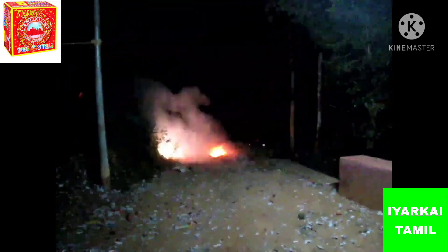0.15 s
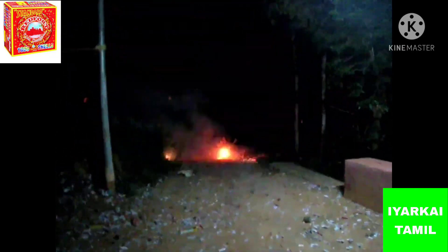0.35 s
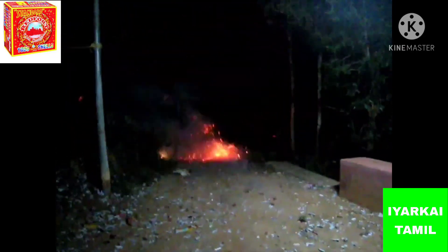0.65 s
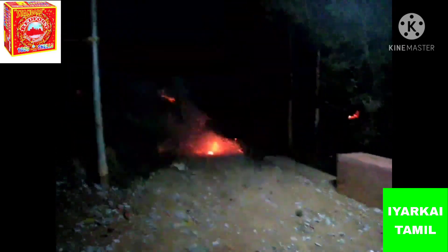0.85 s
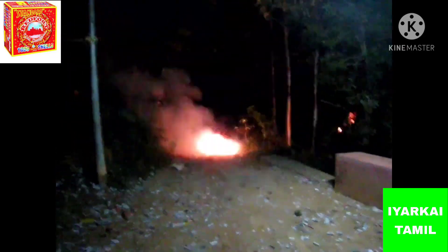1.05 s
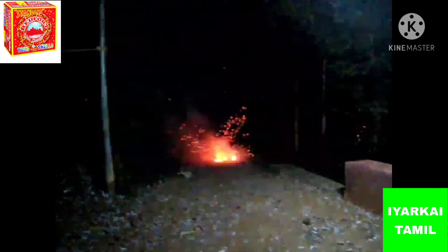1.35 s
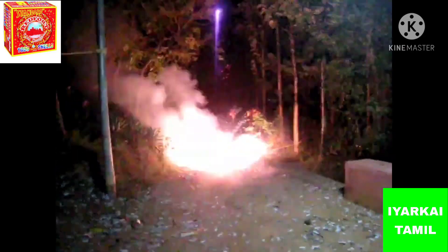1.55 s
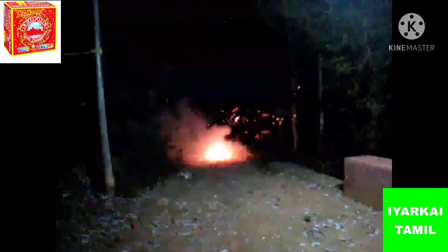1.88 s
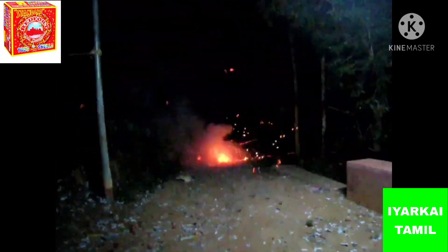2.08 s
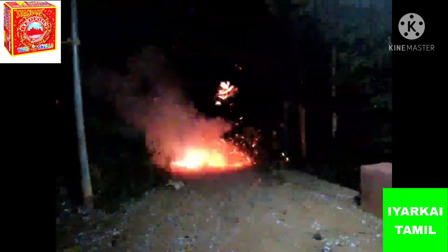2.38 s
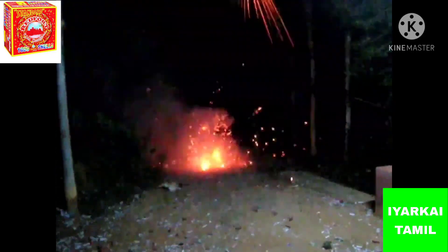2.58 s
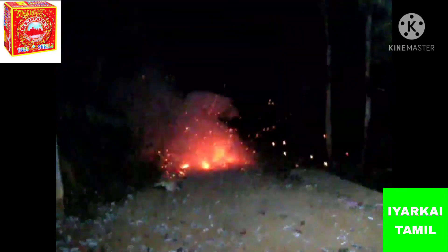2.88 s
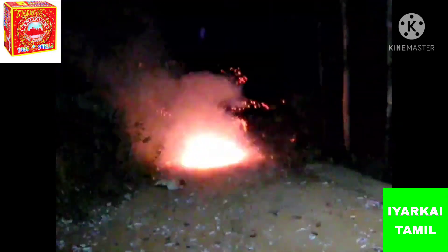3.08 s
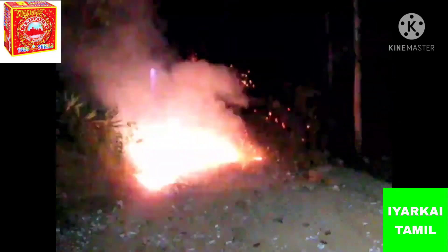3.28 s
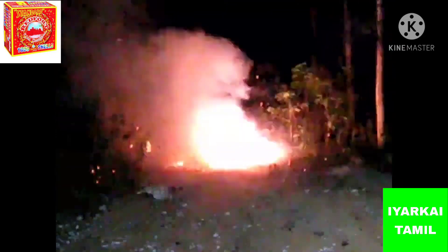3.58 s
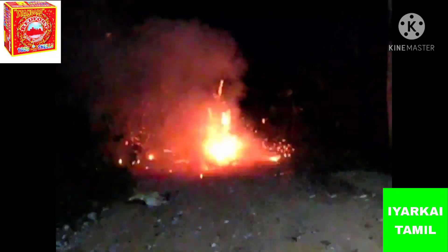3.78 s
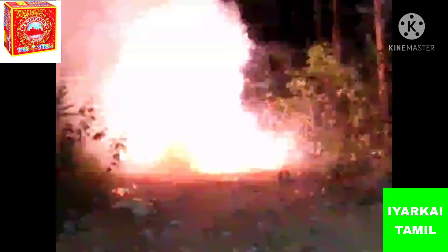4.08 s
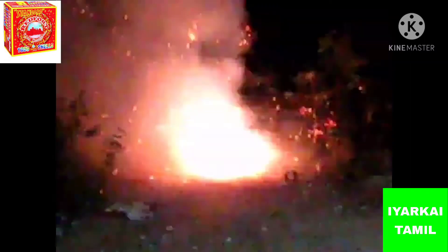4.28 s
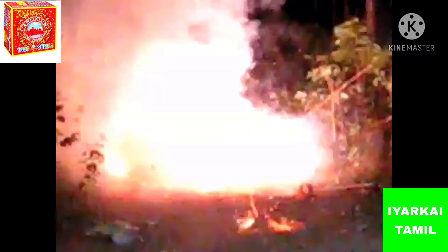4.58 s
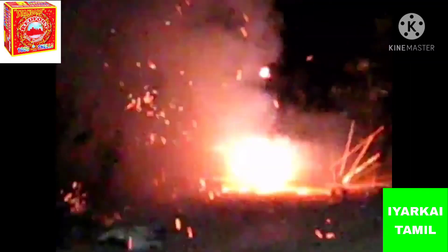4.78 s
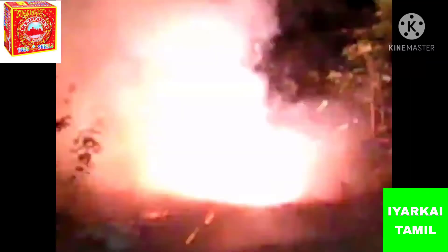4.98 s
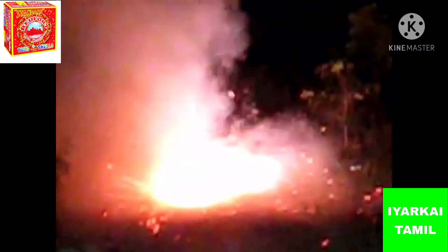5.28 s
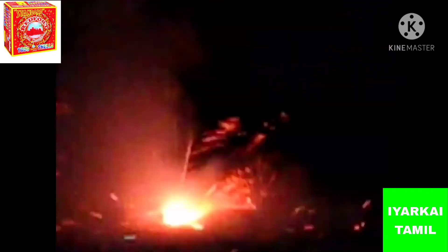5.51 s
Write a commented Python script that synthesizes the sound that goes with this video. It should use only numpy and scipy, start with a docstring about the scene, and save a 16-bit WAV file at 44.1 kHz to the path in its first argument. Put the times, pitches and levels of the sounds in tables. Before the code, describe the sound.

A firecracker string is already exploding at the start, outdoors on a stony track between trees, a few metres from the microphone. For the first two seconds the bangs are hard and irregular, roughly eight a second, with especially strong ones near 0.0, 0.3, 1.1 and 1.25 s. Between them, burning powder swells in hissing, crackling rushes that cut off quickly, and flung sparks fizz briefly. At about 1.6 s a deep, very short whump lands with a strong bang. From 2 s the chain tightens, and after 3 s it becomes a dense, uneven rattle of weak pops and loud cracks, around twenty a second, with heavy hits near 4.35, 4.8 and 5.55 s. Bushes and trees smear each blast into a short noisy wash over a quiet paper hiss. Peaks are flattened by overload, the extreme top is dull, and only the left channel sounds. It ends mid-chain, without slowing.

```python
"""A long string of firecrackers bangs away on a dirt track between trees, some metres from the microphone.
Each cracker is an N-shaped blast wave with close reflections, scatter from stones, a snap and a thump.
Bushes and trees answer with a wash of noise, and flung sparks fizz. Loose powder flares and crackles,
paper hisses on, and one heap gives a deep whump. The blasts overload the microphone; only the left channel sounds."""
import sys
import numpy as np
from scipy import signal
from scipy.fft import rfft, irfft
from scipy.io import wavfile
from scipy.ndimage import uniform_filter1d

SR = 44100
rng = np.random.default_rng(int(sys.argv[2]) if len(sys.argv) > 2 else 0)


def unload_wav(signal):
    """Save mono or channel-first audio to the path in sys.argv[1] as 16-bit WAV at rate SR, clipped to [-1, 1]."""
    wavfile.write(
        sys.argv[1],
        SR,
        np.round(np.clip(np.atleast_2d(signal).T, -1, 1) * 32767).astype(np.int16),
    )


N = 249165  # length of the sound in samples

# The crackers in the order they go off. A ragged burst scatters and snaps more.
# columns: start_s, strength_db, wave_length_ms, raggedness_db
CRACKERS = [(.0011,16,0.48,-19),(0.025,4.5,0.59,-8),(0.1671,3.5,0.77,2.5),(0.2797,18.5,0.56,-3),(0.3449,11,.49,-4.5),(0.3857,6,0.45,-2),(0.4017,-2,0.65,-6),(.463,4,0.47,1),
            (0.5861,12,0.43,-5.5),(0.6064,10.5,0.4,-8.5),(0.6337,5,0.61,-13),(.706,10.5,0.5,-8),(0.7722,14.5,0.45,-6.5),(0.8258,5,0.54,-0.5),(.853,0.5,0.45,5),(0.9831,8.5,0.56,-12),
            (1.1029,17,0.37,-5),(1.1188,5,0.46,-16),(1.1497,10,0.42,-6.5),(1.2573,15.5,0.42,-8.5),(1.306,7,0.43,-1.5),(1.3899,7.5,0.41,0.5),(1.4044,4,0.59,-2),
            (1.6059,17,0.56,-6.5),(1.6372,5.5,0.53,-4),(1.6635,7,0.55,-1),(1.6718,0.5,.52,-4),(1.7277,11,0.4,-4),(1.78,3,0.51,-11),(1.7927,4,0.41,-2),(1.8957,12,0.55,-7),
            (2.0278,6,0.49,3.5),(2.0644,11,0.42,-10.5),(2.1283,12.5,0.59,-10.5),(2.152,7.5,0.5,-13),(2.2338,16.5,0.59,-8.5),(2.2934,8,0.42,-6.5),(2.3348,5,.55,-18),(2.3383,0.5,0.44,-12),(2.396,-4,0.76,-16),(2.4285,13,0.41,-7.5),(2.475,4,0.59,-5.5),(2.494,2,0.46,-8),
            (2.5142,-1,0.52,-6),(2.5696,5,0.54,-10),(2.6367,4.5,0.5,-4),(2.657,5.5,0.43,-12),(2.7376,5,0.5,-6),(2.7905,-4,0.73,-10),(2.8527,4,0.51,-3),(2.8575,12.5,0.37,-3.5),(2.8677,8.5,0.49,-14),(2.8968,4,0.49,-12),(2.954,4.5,0.46,-15),(2.9961,-3,.6,-6),
            (3.0028,2.5,0.49,-2.5),(3.0218,2.5,0.5,-3.5),(3.12,10.5,.45,-7.5),(3.1355,-6,1,-3),(3.1858,11,0.55,-6.5),(3.2101,-1.5,0.54,-15),(3.237,1,0.54,-7),(3.3275,-8.5,0.36,5.5),(3.3694,13.5,0.59,-6.5),(3.3787,9,0.53,-2.5),(3.399,0.5,0.87,-8),(3.4059,3,0.62,-10),
            (3.5313,12,0.38,-9.5),(3.5406,9.5,0.6,-12.5),(3.6035,-0.5,0.69,-5),(3.6343,13,0.43,-11.5),(3.6924,4.5,0.66,-6.5),(3.7263,5.5,0.54,-5.5),(3.7542,5.5,0.37,-6),(3.7673,1,.4,-7),(3.8024,-3,0.71,-14),(3.8407,-0.5,0.73,-5),(3.8811,10.5,0.59,-11),(3.8986,1,0.64,-14),(3.9581,9,0.37,-4),(3.9836,9,0.57,-14),
            (4.0681,11.5,0.37,-7.5),(4.0789,-3.5,0.82,-12),(4.098,0,0.63,-2),(4.1126,-5,0.98,-13),(4.121,3.5,0.55,-3),(4.134,12,.35,-21),(4.15,-2,0.66,3.5),(4.1969,4.5,0.51,-0.5),(4.299,1,.58,-18),(4.3361,-3.5,.9,-7),(4.3531,16,0.35,-11),(4.368,6.5,.55,-6),(4.4164,12,0.53,-7),(4.463,1.5,0.57,-10),(4.4988,0,.76,-4.5),
            (4.5065,-1,0.63,-0.5),(4.5588,3,0.4,-2.5),(4.6165,-2.5,0.7,-1),(4.6611,-7,0.63,-10),(4.6649,-4,0.92,-4),(4.712,12.5,0.47,-8.5),(4.7448,12.5,0.45,-23),(4.7648,3,0.6,-9),(4.8046,-5,0.98,-1),(4.8079,15,0.38,-22),(4.882,-3,0.79,-4),(4.9209,-1,0.78,-0.5),(4.9256,11,0.47,-10),(4.9514,1.5,0.56,-5),(4.9769,1,.56,0),
            (5.0502,2,0.79,-3),(5.064,6.5,0.59,-3),(5.0768,-3,0.66,-3),(5.1437,-4.5,0.57,0),(5.1475,-4.5,0.86,4.5),(5.1723,8,0.59,-2),(5.1916,5,0.43,-14),(5.2063,2,0.47,-2.5),(5.2236,-2,0.37,-2),(5.2391,2,0.49,-3.5),(5.2907,3,0.54,-12),(5.2985,5,.61,-8),(5.348,-5.5,.48,-17),(5.378,-3,0.6,0.5),(5.4229,-5,0.55,-6),(5.4572,3.5,0.55,-26),(5.4841,10.5,0.43,-13),
            (5.5482,16,.39,-18),(5.557,6.5,0.47,-15),(5.5822,-2,0.83,-14),(5.603,0,0.4,-6),(5.6286,10,0.49,-7)]
# Tone of burning powder and paper: how loud each pitch region is.
# columns: frequency_hz, level_db
FIRE_COLOUR = [(40, -24), (150, -20), (300, -13), (450, -8), (620, -3), (800, -1.5), (1000, 3.5),
               (1300, -0.5), (1900, 0), (2700, -3.5), (3800, -7), (5200, -9.5), (8000, -18.5), (15000, -24)]


def undb(db):
    """Turn decibels into a plain multiplier."""
    return 10 ** (np.asarray(db) / 20)


def butter(x, hz, kind, order=1):
    """Keep the sound below hz ("low") or above it ("high"), without looking ahead in time."""
    return signal.sosfilt(signal.butter(order, hz, kind, fs=SR, output="sos"), x)


def colour(x, points, size=2048):
    """Give a sound the tone drawn by (frequency_hz, level_db) points, without looking ahead in time."""
    hz, db = np.transpose(points)
    bins_hz = np.maximum(np.arange(size // 2 + 1) * SR / size, 1)
    gain = undb(np.interp(np.log(bins_hz), np.log(hz), db))
    # folding the cepstrum forward makes the filter answer as early as it can
    cepstrum = irfft(np.log(gain))
    cepstrum[1:size // 2] *= 2
    cepstrum[size // 2 + 1:] = 0
    response = irfft(np.exp(rfft(cepstrum)))
    return signal.fftconvolve(x, response)[:len(x)]


def decay(t, t60_s):
    """Die away by 60 dB in t60_s seconds."""
    return np.exp(-np.log(1000) * t / t60_s)


def walk(rate):
    """Slow chance: random levels, rate of them a second, joined by straight lines."""
    knots = rng.standard_normal(N // 100)
    return np.interp(np.arange(N) / SR * rate, np.arange(len(knots)), knots)


def tail(t, rise_s, t60_s, patchy_db=4):
    """A cloud of uneven echoes that builds up and dies away, scaled to an energy of one."""
    paths = rng.standard_normal(len(t)) * undb(patchy_db * rng.standard_normal(len(t)))
    cloud = paths * (1 - np.exp(-t / rise_s)) * decay(t, t60_s)
    return cloud / np.sqrt(np.sum(cloud ** 2))


def blast_wave(t, length_ms, rear_softness=0.27, low_cut_hz=380, shock_hz=7000):
    """An N-shaped wave: a shock front, a fall into suction, and a softer rear shock."""
    progress = 1000 * t / length_ms  # 1 at the rear shock
    rear = (1 - np.tanh((progress - 1) / rear_softness)) / 2
    wave = (1 - 2 * progress) * rear
    return butter(butter(wave, low_cut_hz, "high"), shock_hz, "low", order=2)


def cracker(t, length_ms, scatter_db, path_spread=0.068, reflection_hz=2200,
            scatter_hz=4000, stone_hz=800, stone_db=2.0):
    """One blast with its reflections; every cracker jumps to a new place, so its paths differ."""
    # Reflections from surfaces close by; each delay varies a little from blast to blast.
    # columns: usual_delay_ms, level_db
    near_reflections = [(1.748, -16.5), (2.102, -10.5), (3.7, -22)]
    # Resonances that every blast rings at the microphone.
    # columns: pitch_hz, level_db, time_to_fall_60_db_s
    ringing = [(645, -31.5, 0.037), (1010, -38.5, 0.043), (472, -28, 0.0085)]
    wave = blast_wave(t, length_ms)
    dull = butter(wave, reflection_hz, "low")
    out = wave.copy()
    for delay_ms, db in near_reflections:
        lag_s = delay_ms * (1 + path_spread * rng.standard_normal()) / 1000
        out += undb(db) * np.interp(t - lag_s, t, dull, left=0)
    for hz, db, t60_s in ringing:
        out += undb(db) * np.sin(2 * np.pi * hz * t) * decay(t, t60_s)
    stones = tail(t, rise_s=0.0002, t60_s=0.023)
    # long waves pass round the stones, short ones bounce off
    bouncing = butter(butter(wave, stone_hz, "high"), scatter_hz, "low")
    scattered = signal.fftconvolve(bouncing, stones)[:len(t)]
    return out + undb(stone_db + scatter_db) * scattered


def snap(t, t60_s=0.0042, low_cut_hz=2200, high_cut_hz=6500):
    """The paper casing tears: a very short, bright, ragged burst of noise."""
    tear = rng.standard_normal(len(t)) * decay(t, t60_s)
    return butter(butter(tear, low_cut_hz, "high", order=2), high_cut_hz, "low")


def thump(t, push_s=0.0014, rise_s=0.00016):
    """The ball of gas swells and falls back, much more slowly than the shock."""
    return (1 - t / push_s) * np.exp(-t / push_s) * (1 - np.exp(-t / rise_s))


def string(size=2048, usual_length_ms=.55):
    """The crackers go off one after another as the fuse reaches them."""
    # Tone of the blasts at this distance.
    # columns: frequency_hz, level_db
    blast_tone = [(40, -13.5), (150, 2.5), (260, 13.5), (400, 5), (630, 5), (770, 1), (1000, 2), (1300, 1),
                  (2100, 2), (2900, 7.5), (3900, 4.5), (6000, 5.5), (15000, 6)]
    t = np.arange(size) / SR
    out = np.zeros(N + size)
    for start_s, strength_db, length_ms, ragged_db in CRACKERS:
        doublings = np.log2(length_ms / usual_length_ms)
        # long and ragged blasts snap and thump more; weak ones leave more casing to snap
        snap_db = -10 + 1 * ragged_db - 0.014 * strength_db + 5.5 * doublings
        thump_db = -23 + 17.5 * doublings + .5 * ragged_db
        bang = cracker(t, length_ms, ragged_db)
        bang = bang + undb(snap_db) * snap(t) + undb(thump_db) * thump(t)
        start = int(start_s * SR)
        out[start:start + size] += undb(strength_db) * bang
    return colour(out[:N], blast_tone)


def woods(bangs, bushes_db=-17, trees_db=-20):
    """Bushes answer at once, the trees later and longer; countless changing paths add up as energy."""
    # Tone of the echo from the trees and bushes.
    # columns: frequency_hz, level_db
    woods_tone = [(40, -22), (120, -21.5), (300, -14), (560, -6.5), (750, -3), (1000, 1), (2500, -1.5),
                  (5000, -12.5), (9000, -19.5), (15000, -14)]
    t = np.arange(SR) / SR
    bushes = undb(bushes_db) * tail(t, rise_s=0.0071, t60_s=0.14)
    trees = undb(trees_db) * tail(t, rise_s=0.056, t60_s=0.75)
    echo_energy = uniform_filter1d((bushes + trees) ** 2, size=64)
    energy = signal.fftconvolve(bangs ** 2, echo_energy)[:N]
    wash = colour(rng.standard_normal(N), woods_tone)
    return np.sqrt(np.abs(energy)) * wash / wash.std()


def spray(low_cut_hz=2200, high_cut_hz=5500, patchy_db=1.0, hold_s=0.036, fade_s=.008):
    """The sparks flung out by each blast fizz brightly, hold for a moment and go out."""
    t = np.arange(SR // 2) / SR
    lit = np.zeros(N)
    for start_s, strength_db, _, ragged_db in CRACKERS:
        # a strong or ragged blast flings more sparks
        spray_db = -35 + 0.44 * strength_db + 0.19 * ragged_db
        lit[int(start_s * SR)] += undb(spray_db) ** 2
    glow = np.exp(-np.maximum(t - hold_s, 0) / fade_s)
    energy = signal.fftconvolve(lit, glow)[:N]
    fizz = rng.standard_normal(N) * undb(patchy_db * rng.standard_normal(N))
    fizz = butter(butter(fizz, low_cut_hz, "high"), high_cut_hz, "low")
    return np.sqrt(np.abs(energy)) * fizz / fizz.std()


def burning_db(fade_s=0.024):
    """Level of the fire: each heap grows exponentially until it is spent, then dies quickly."""
    # Heaps of powder that catch, swell and burn out.
    # columns: peak_s, level_db, swell_s
    heaps = [(.01,-21.5,.05),(.115,-18.5,.05),(.165,-19,0.079),(.275,-19,0.095),(.48,-25,0.18),(.585,-16.5,0.077),(.765,-21.5,0.12),(.84,-22,0.14),(1.0,-17.5,0.02),(1.1,-20,0.17),
             (1.265,-23.5,0.16),(1.405,-23,0.15),(1.585,-18.5,0.08),(1.67,-23,.05),(2.03,-22,0.033),(2.135,-21.5,0.21),(2.245,-25.5,0.078),(2.48,-29,0.054),(2.655,-19.5,0.0091),
             (2.78,-31,0.081),(2.855,-17,0.077),(3.18,-23.5,0.057),(3.41,-23.5,0.057),(3.55,-27,0.064),(3.722,-24,0.12),(3.88,-28,.06),(3.975,-24,0.12),(4.14,-20.5,0.049),(4.31,-27,0.18),
             (4.4,-25,0.088),(4.52,-24.5,0.014),(4.75,-22,0.04),(4.96,-26.5,0.12),(5.075,-24.5,0.075),(5.195,-19.5,0.034),(5.26,-28,.05),(5.49,-21.5,0.058),(5.56,-20,0.073),(5.65,-29,0.096)]
    t = np.arange(N) / SR
    power = 0
    for peak_s, db, swell_s in heaps:
        away = np.maximum((peak_s - t) / swell_s, (t - peak_s) / fade_s)
        power = power + (undb(db) * np.exp(-np.minimum(away, 20))) ** 2
    return 10 * np.log10(power)


def crackle(fire_db, count=420, size=256, gain_db=4, spread_db=4.0, length_ms=0.25):
    """Scraps of powder pop as tiny blast waves that follow the strength of the flare around them."""
    pops = np.zeros(N)
    for when, luck in rng.random((count, 2)):
        pops[int(when * N)] += undb(spread_db * min(-np.log(1 - luck), 4))
    wave = blast_wave(np.arange(size) / SR, length_ms)
    return signal.fftconvolve(pops * undb(gain_db + fire_db), wave)[:N]


def flare(spark_db=-7, spark_spread_db=2.0, sparks_per_s=2500, flicker_db=1.5, bright_hz=4000):
    """Burning powder: a fluttering rush of gas full of tiny bursting sparks."""
    fire_db = burning_db()
    bright_db = -1 - 0.2178 * fire_db  # a larger flame is duller
    sizes = undb(spark_spread_db * np.minimum(rng.exponential(size=N), 4))
    sparks = (rng.random(N) < sparks_per_s / SR) * rng.standard_normal(N) * sizes
    gas = rng.standard_normal(N)
    rush = colour(gas + undb(spark_db) * sparks / sparks.std(), FIRE_COLOUR)
    rush = rush / rush.std()
    rush = rush + (undb(bright_db) - 1) * butter(rush, bright_hz, "high")
    return rush * undb(fire_db + flicker_db * walk(60)) + crackle(fire_db)


def smoulder(level_db=-36, high_cut_hz=5000, flicker_db=2.5):
    """The burning paper keeps up a dull, quiet rush that is heard between the flares."""
    rush = butter(colour(rng.standard_normal(N), FIRE_COLOUR), high_cut_hz, "low")
    return rush / rush.std() * undb(level_db + flicker_db * walk(23))


def whump(at_s=1.609, db=-9, ring_hz=55, t60_s=0.033, rise_s=0.00054):
    """Once, a heap of loose powder goes up together and shoves the air with a deep whump."""
    t = np.maximum(np.arange(N) / SR - at_s, 0)
    push = np.cos(2 * np.pi * ring_hz * t) * (1 - np.exp(-t / rise_s))  # silent until at_s
    return undb(db) * push * decay(t, t60_s)


def scene():
    """Bangs, their echo, their sparks and the burning powder and paper, all in the left channel."""
    bangs = string()
    left = bangs + woods(bangs) + spray() + flare() + smoulder() + whump()
    return np.array([left, np.zeros(N)])


def record(dry):
    """The microphone overloads and flattens the blasts; the corners are rounded and the top is cut steeply."""
    clipped = .93 * dry / (1 + np.abs(dry) ** 16) ** (1 / 16)
    rounded = butter(clipped, 15000, "low")
    steep_cut = signal.firwin(401, 15500, window=("kaiser", 8), fs=SR)  # cuts above 15500 Hz
    return signal.fftconvolve(rounded, steep_cut[None], "same", axes=1)


dry = scene()
out = record(dry)
unload_wav(out)
```